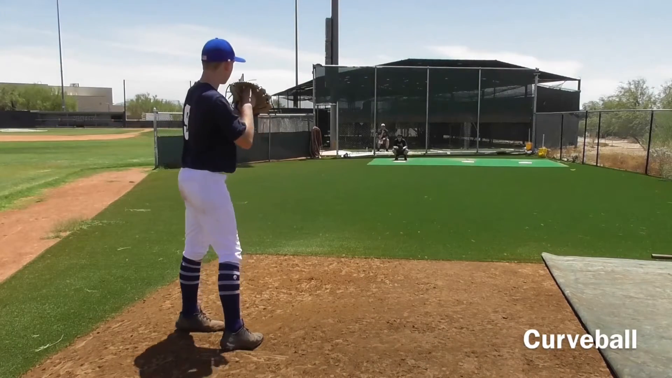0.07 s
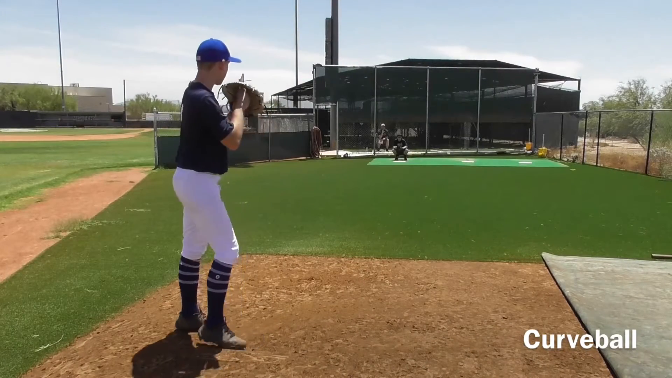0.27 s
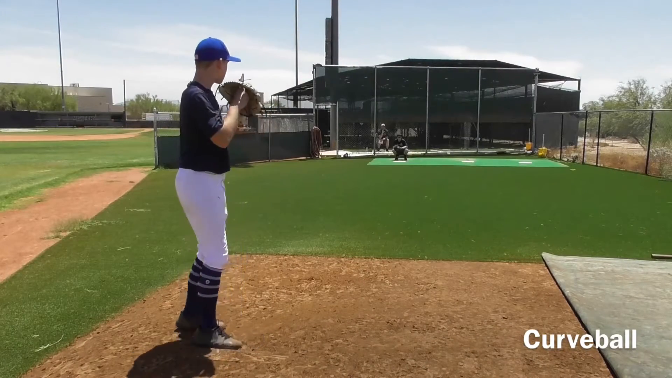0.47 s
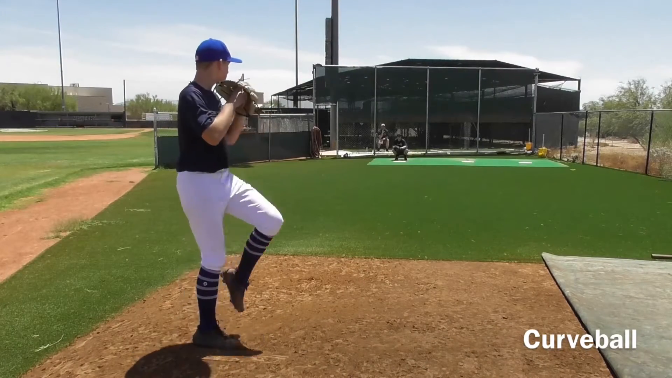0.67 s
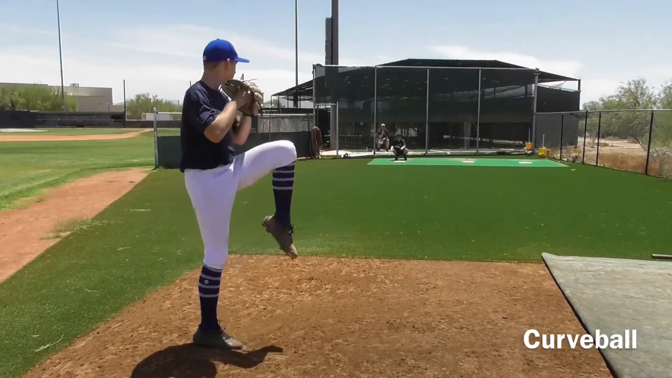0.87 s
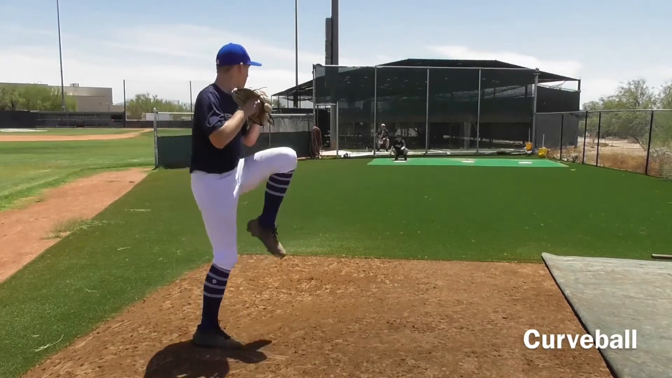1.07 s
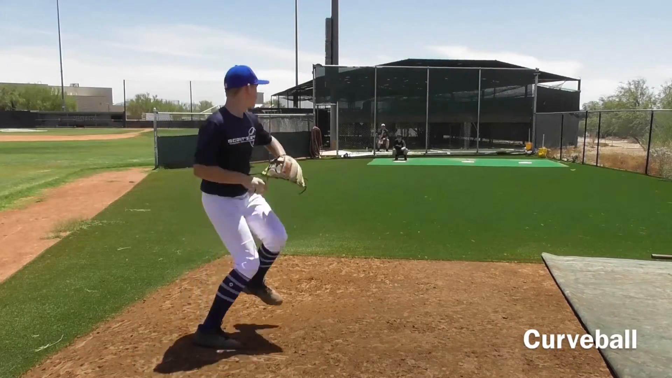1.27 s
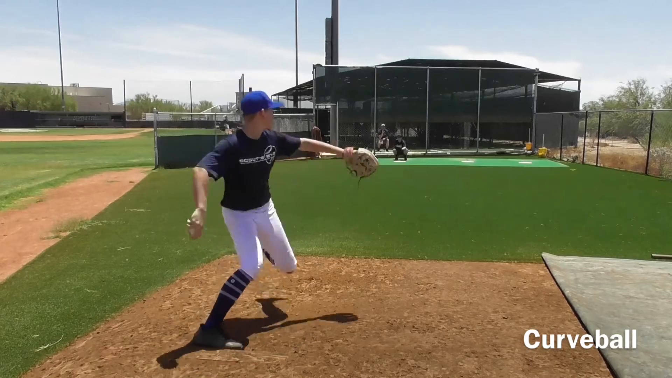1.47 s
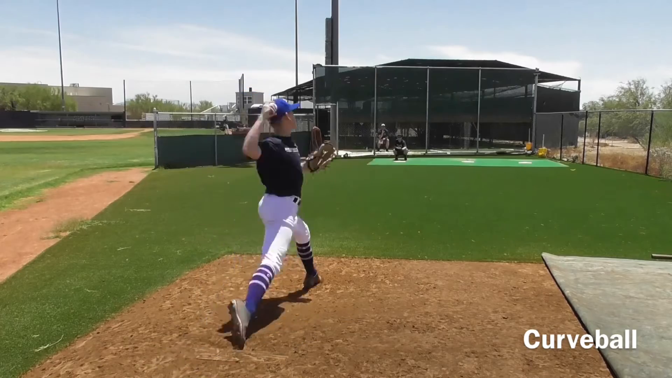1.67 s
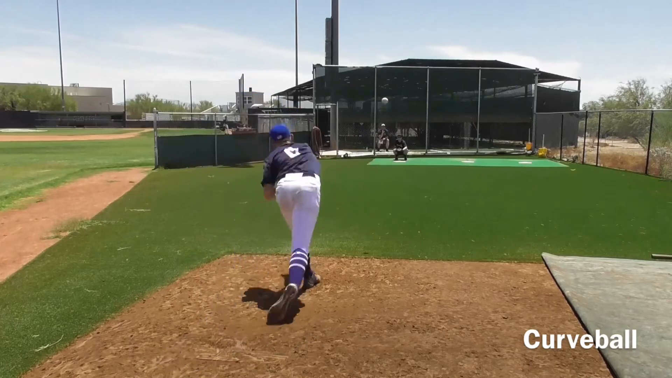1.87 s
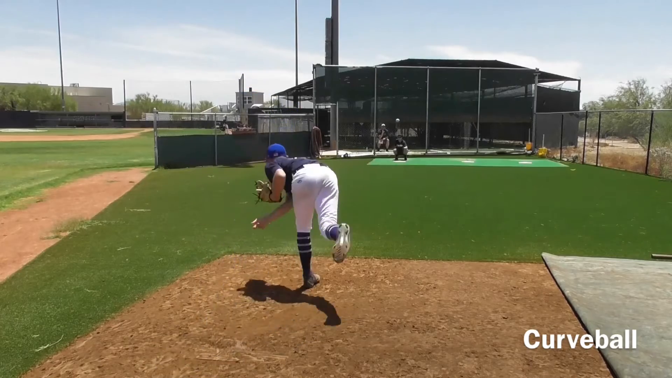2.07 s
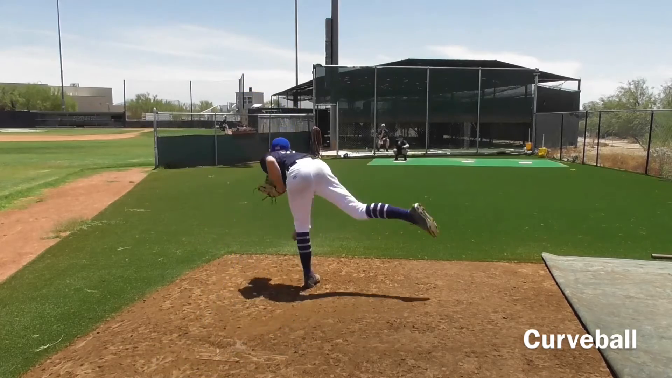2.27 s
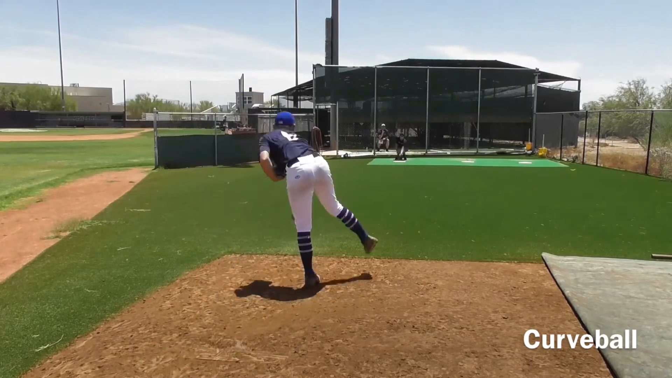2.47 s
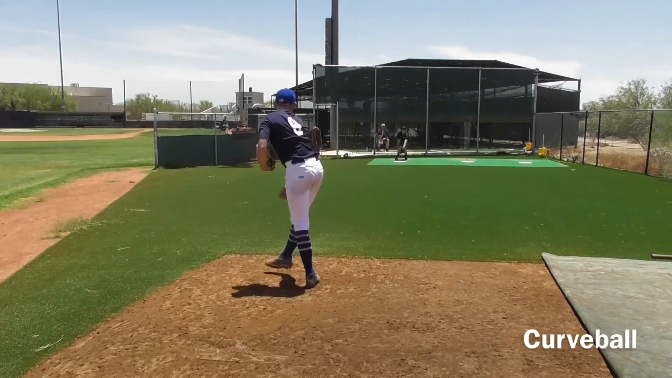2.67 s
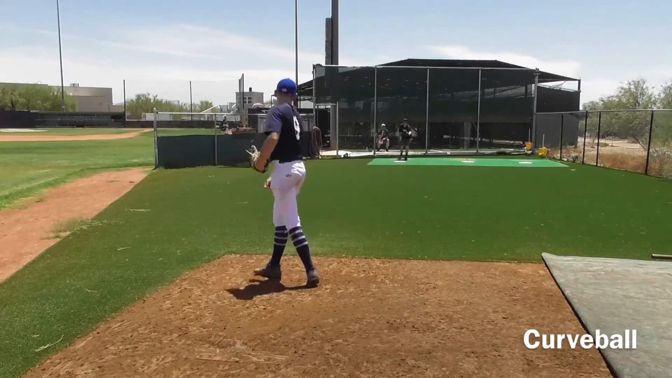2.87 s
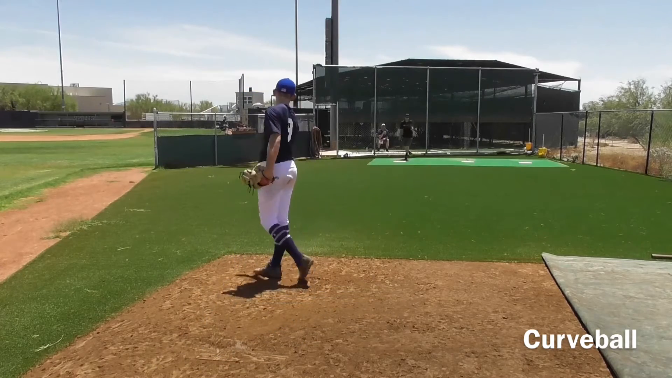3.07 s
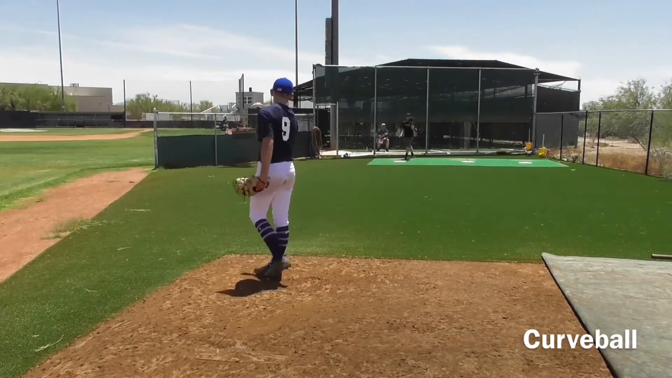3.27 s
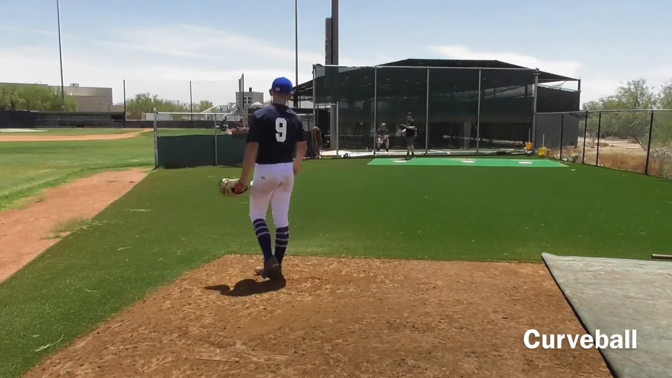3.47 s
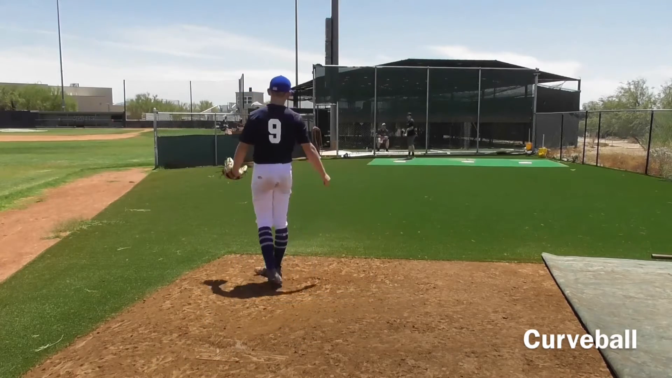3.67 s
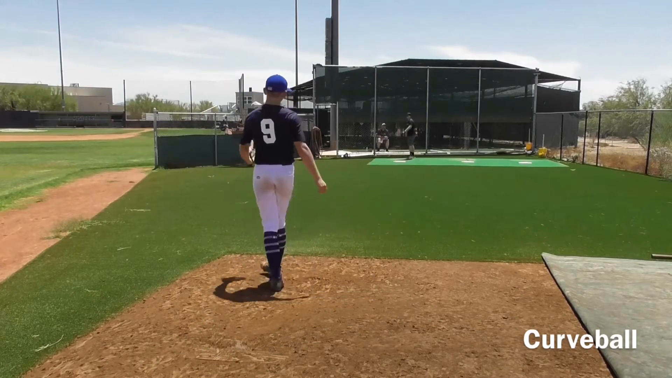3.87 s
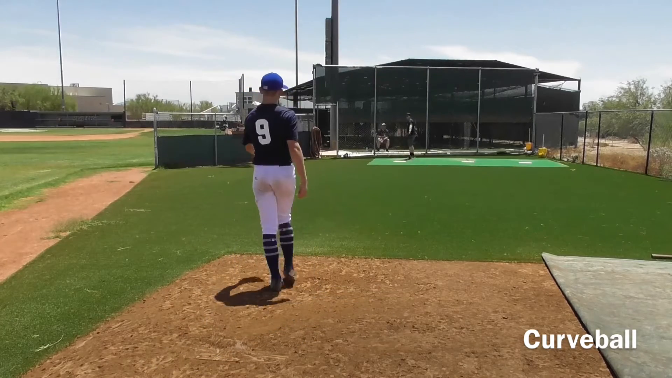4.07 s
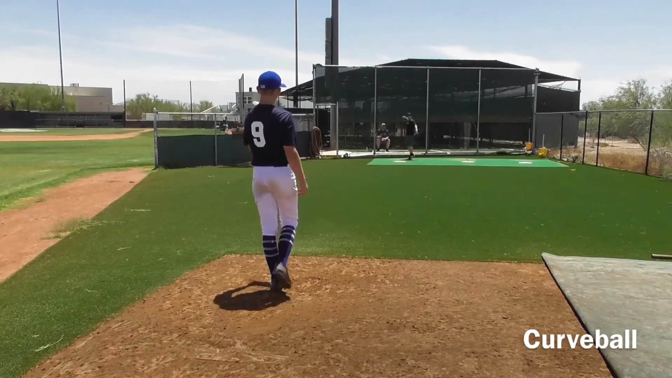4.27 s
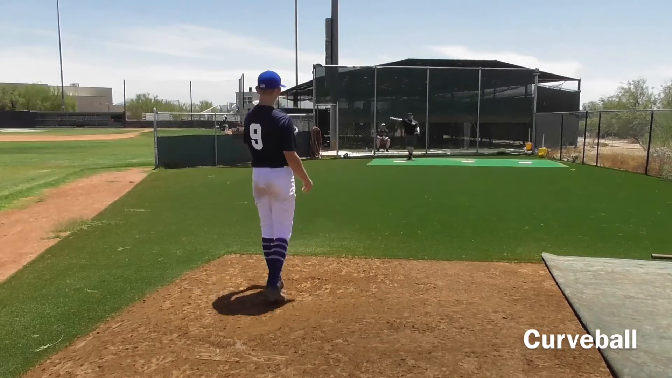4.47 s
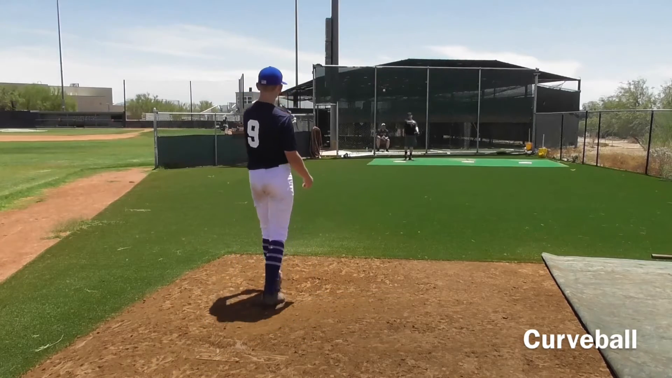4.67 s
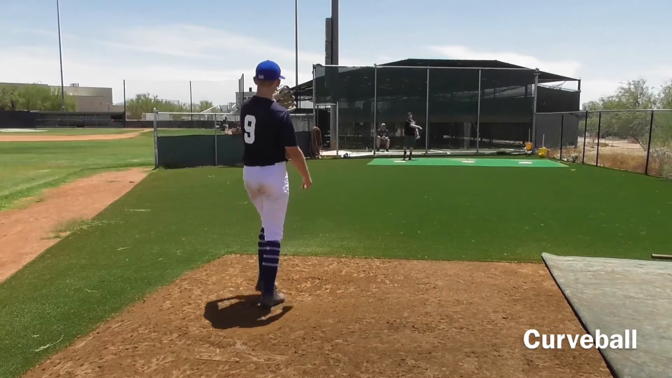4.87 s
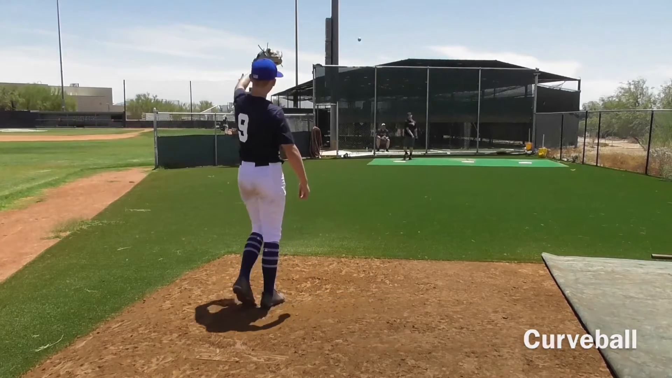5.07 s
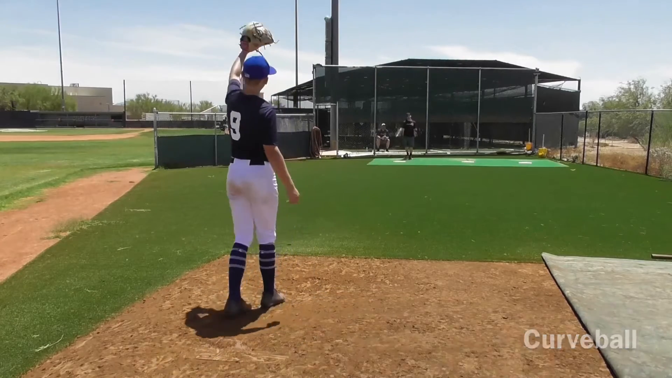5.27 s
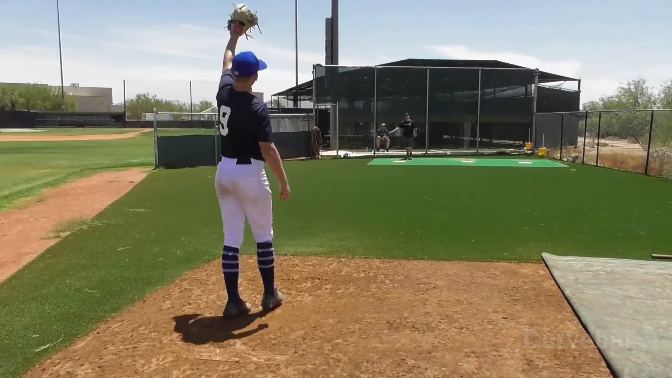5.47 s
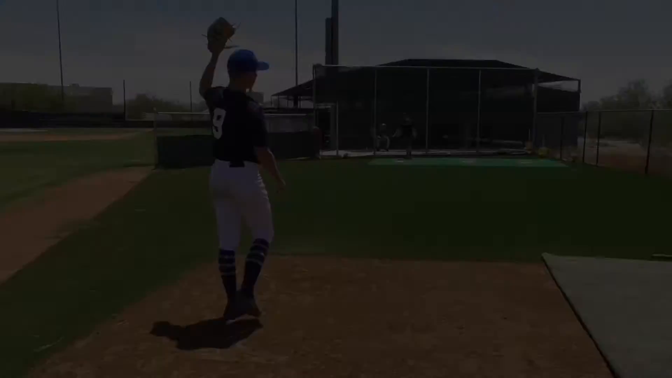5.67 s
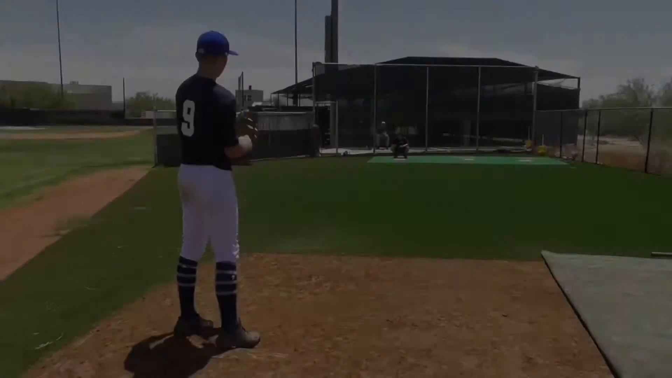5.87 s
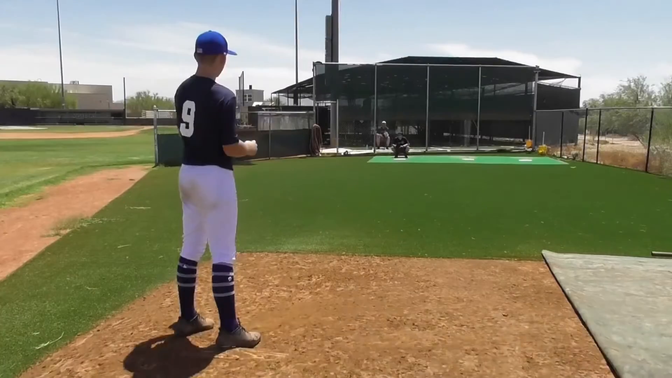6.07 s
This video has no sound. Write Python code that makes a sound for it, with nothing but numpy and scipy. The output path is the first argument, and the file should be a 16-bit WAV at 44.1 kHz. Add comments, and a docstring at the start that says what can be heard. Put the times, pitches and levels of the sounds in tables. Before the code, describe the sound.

From behind a pitching mound on an open field, faint low rumble and a wavering distant hum sit under soft wind thumps and small taps. Shoes crunch and scrape dirt, then a thrown ball lands in a catcher's mitt with a deep, rounded pop and slight shelter echo. After a quiet wait, the return throw smacks crisply into the nearer glove, and a rough gust overloads the microphone.

```python
"""First a wavering far hum and low rumble over an open field, with soft wind thumps and small taps of cleats and glove.
A pitcher's shoes scuff the dirt mound; the ball pops in the catcher's mitt, and the return throw smacks into
the pitcher's own glove, nearer by. At the end a strong gust buffets the microphone.
Filtered noise makes the field, wind and cloth; gliding sines the hum and eddies; sparse grains the dirt;
decaying noise cracks and short pressure swings the catches."""
import sys
import numpy as np
from scipy import signal
from scipy.fft import rfft, irfft, next_fast_len
from scipy.io import wavfile
from scipy.ndimage import uniform_filter1d, map_coordinates

SR = 44100
rng = np.random.default_rng(int(sys.argv[2]) if len(sys.argv) > 2 else 0)


def wrap_up_sound(samples):
    """Save the sound to the file named by the first command line argument, as 16-bit audio."""
    columns = np.atleast_2d(samples).T
    # keep every value between -1 and 1, then stretch to whole-number steps
    tamed = np.clip(columns, -1, 1)
    steps = np.round(tamed * 32767).astype(np.int16)
    wavfile.write(sys.argv[1], SR, steps)


N = 269627
T = np.arange(N) / SR  # time [s]


def undb(db):
    """Decibels to gain."""
    return 10 ** (np.asarray(db) / 20)


def unit(x):
    """Scale to rms 1."""
    return x / np.sqrt(np.mean(x ** 2))


def colour(x, points, tilt_db=0):
    """Filter by (frequency [Hz], level [dB]) points, tilted about 2 kHz by tilt_db per octave."""
    octave = np.log2(np.maximum(np.arange(len(x) // 2 + 1) * SR / len(x), 1))
    hz, db = np.transpose(points)
    below = np.maximum(np.log2(hz[0]) - octave, 0)
    above = np.maximum(octave - np.log2(hz[-1]), 0)
    # beyond the outer points the curve falls 24 dB per octave
    shape = np.interp(octave, np.log2(hz), db) + tilt_db * (octave - 11) - 24 * (below + above)
    return irfft(rfft(x) * undb(shape), len(x))


def white():
    """White noise, padded to a length that transforms fast."""
    return rng.standard_normal(next_fast_len(N, True))


def noise(points):
    """Coloured noise of rms 1."""
    return unit(colour(white(), points)[:N])


def walk(rate):
    """Random drift with a spread near 1, heading for a new value `rate` times a second."""
    knots = rng.standard_normal(4096)
    return 1.2 * map_coordinates(knots, [T * rate], order=1, mode="wrap")


def bump(at, length):
    """A smooth swell around one moment."""
    return np.exp(-np.minimum(((T - at) / length) ** 2, 50))


def swell(at, rise, fall):
    """Grows exponentially up to one moment, then dies away."""
    return np.exp(-np.minimum(np.maximum((at - T) / rise, (T - at) / fall), 50))


def stereo(mid, side=0):
    """Left and right from mid and side."""
    return np.array([mid + side, mid - side])


def add(out, at, sound):
    """Mix a short sound in at a time."""
    i = int(at * SR)
    out[i:i + len(sound)] += sound[:N - i]


def burst(points, t60, tilt_db, rise=0.00072, grain_db=3):
    """A grainy crack of noise that dies away; evened out in pitch so that only the material colours it."""
    t = np.maximum(T[:8192] - .0005, 0)
    envelope = undb(-60 * t / t60) * (1 - np.exp(-t / rise))
    # fibres and grains give way one after another, about a millisecond each
    grains = undb(grain_db * np.repeat(rng.standard_normal(256), 32))
    spectrum = rfft(rng.standard_normal(len(t)) * grains * envelope)
    spectrum /= np.sqrt(uniform_filter1d(np.abs(spectrum) ** 2, size=70))
    crack = colour(irfft(spectrum), points, tilt_db)[:6000]
    # same energy as the envelope, whatever the colour
    return crack * np.sqrt(np.sum(envelope ** 2) / np.sum(crack ** 2))


def surroundings(x, t60, wet_db, width):
    """Scatter from fences and the shelter: a thin tail, a little different at each ear."""
    t = T[:SR // 2]
    fade = undb(-60 * t / t60) * np.minimum(t / .012, 1)
    tails = rng.standard_normal((2, len(t))) * fade / np.sqrt(np.sum(fade ** 2))
    mid, side = (signal.fftconvolve(x, tail)[:N] for tail in tails)
    return undb(wet_db) * stereo(mid, width * side)


# stereo width of the open field: (frequency [Hz], side minus mid [dB])
FIELD_WIDTH = [(60, -0.5), (110, -12.5), (200, -11), (700, -11), (1300, -6), (4400, -48.5), (8000, -19),
               (13000, 4)]


def bed(points):
    """Steady stereo noise, wide in the deep bass and the top."""
    hz, db = np.transpose(points)
    width_hz, width_db = np.transpose(FIELD_WIDTH)
    side_points = np.transpose([hz, db + np.interp(np.log(hz), np.log(width_hz), width_db)])
    mid = colour(white(), points)[:N]
    side = colour(white(), side_points)[:N]
    return stereo(mid, side) / np.std(mid)


# colour of the distant traffic: (frequency [Hz], level [dB])
RUMBLE_COLOUR = [(12, -41), (20, -7.5), (43, -6), (103, -1.5), (136, -4.5), (166, -1), (190, -5.5),
                 (220, -4.5), (270, -9), (377, -10), (463, -17), (793, -16.5), (1700, -37.5), (2210, -37.5),
                 (3740, -120)]
# colour of the rustle: (frequency [Hz], level [dB])
RUSTLE_COLOUR = [(880, -12), (1500, -32), (1640, -7), (2160, -3.5), (2340, -4.5), (2970, -8), (3660, -4.5),
                 (4040, -7.5), (4330, -10.5), (5020, -17), (6630, -11.5), (8240, -3.5), (9470, -5.5),
                 (15100, -10.5), (16000, -9.5)]
# lines of the far machine, before the lull and the wavering: (frequency [Hz], peak level [dB])
HUM_LINES = [(166.5, -49.5), (216.5, -56), (333, -63.5), (384, -62)]
# one slow swell of breeze lifts the background
BREEZE_PEAK_S, BREEZE_RISE_S, BREEZE_FALL_S = 0.96, 0.48, 2.93
RUMBLE_DB, RUMBLE_SWELL_DB = -46.5, 1.5  # in still air, and the lift at the peak
RUSTLE_DB, RUSTLE_SWELL_DB = -70.5, 4
HUM_WAVER, HUM_FADE_DB = 0.00598, 2.5  # share of the pitch; spread of the level
HUM_ARRIVES_S, HUM_LULL_DB = 1.35, -7  # the hum grows from a lull as the breeze carries it in
DIP_S = 5.827


def field():
    """Distant traffic and rustle swell with the breeze; a far machine's hum wavers on it."""
    breeze = swell(BREEZE_PEAK_S, BREEZE_RISE_S, BREEZE_FALL_S)
    rumble = bed(RUMBLE_COLOUR) * undb(RUMBLE_DB + RUMBLE_SWELL_DB * breeze + 0.56 * walk(5.04))
    rustle = bed(RUSTLE_COLOUR) * undb(RUSTLE_DB + RUSTLE_SWELL_DB * breeze)
    lull_db = HUM_LULL_DB * np.maximum(1 - T / HUM_ARRIVES_S, 0)
    hum = 0
    for hz, db in HUM_LINES:
        phase = 2 * np.pi * np.cumsum(hz * (1 + HUM_WAVER * walk(8.04))) / SR
        hum = hum + undb(db + lull_db + HUM_FADE_DB * walk(2.976)) * np.sin(phase)
    # the level dips briefly before the gust
    dip = 1 - .9 * bump(DIP_S, .016)
    balance = undb([[-.3], [.3]])  # the rumble leans right
    return (rumble * balance + rustle + stereo(hum)) * dip


# eddies nudging the microphone: (time [s], level [dB], length [s], centre frequency [Hz])
EDDY_THUMPS = [(0.013, -34, 0.023, 79.6), (0.11, -30, 0.018, 80.3), (0.205, -37, 0.028, 90.2),
               (0.256, -30.5, 0.011, 54.2), (1.033, -40, 0.017, 65), (1.32, -31, 0.0089, 65.7),
               (1.416, -27, 0.0078, 62)]
EDDY_OCTAVE_DB = -11  # smaller whirls an octave above each eddy


def eddies():
    """Light wind thumps both microphone ports alike: short low tones of wobbling pitch."""
    out = 0
    wobble = np.cumsum(undb(1.155 * walk(60))) / SR  # time that runs unevenly
    for at, db, length, hz in EDDY_THUMPS:
        phase = 2 * np.pi * hz * wobble
        whirl = np.sin(phase) + undb(EDDY_OCTAVE_DB) * np.sin(2 * phase)
        out = out + undb(db) * bump(at, length) * whirl
    return stereo(out)


# faint swishes of cloth and turf: (time [s], level [dB], length [s], centre frequency [Hz])
SOFT_RUBS = [(1.233, -73, .06, 8500), (1.55, -69, 0.037, 8500), (3.09, -66, 0.16, 1370),
             (3.13, -47, 0.085, 247), (3.197, -77.5, 0.12, 3700), (3.673, -72, .1, 2300),
             (5.2, -74.5, 0.11, 3500), (5.61, -71.5, 0.07, 8500)]


def swishes():
    """Soft rubs as the players shift and walk: swells of noise around one pitch."""
    out = 0
    for at, db, length, hz in SOFT_RUBS:
        band = [(hz * 0.57, -18), (hz, 0), (hz * 1.37, -18)]
        out = out + undb(db) * bump(at, length) * noise(band)
    return stereo(out)


# small knocks of cleats and glove: (time [s], level [dB], tilt [dB/octave])
TAPS = [(.161, -44, -2), (.326, -38, -3), (.523, -47, -2), (.591, -33.5, -6.5), (.617, -47, -1),
        (1.183, -32.5, 0), (1.686, -28, -7), (2.222, -51, 1), (2.770, -34, -3), (4.574, -54, 6),
        (5.613, -47.5, 0.5), (5.655, -43, -.5)]
# colour of a knock: (frequency [Hz], level [dB])
TAP_COLOUR = [(170, -8.5), (500, 2), (1000, -2), (1500, -13), (2100, -11), (3800, -20.5), (5200, -30.5),
              (8000, -18), (15000, -29)]
TAP_T60_S = 0.026


def knocks():
    """Short taps of cleats and glove: brief noise bursts, scattered by the surroundings."""
    out = np.zeros(N)
    for at, db, tilt_db in TAPS:
        add(out, at, undb(db) * burst(TAP_COLOUR, TAP_T60_S, tilt_db, rise=0.00073))
    return stereo(out) + surroundings(out, t60=0.27, wet_db=-9.5, width=0.26)


def grit(points, spread_db, tilt_db=0):
    """Dense grains of unequal size and random sign, coloured to rms 1."""
    present, sign, size = rng.random((3, next_fast_len(N, True)))
    weight = undb(-spread_db * np.log(np.maximum(size, .005)))  # few large grains, many small
    grains = (present < .12) * np.sign(sign - .5) * weight
    return unit(colour(grains, points, tilt_db)[:N])


# shoes on the mound (heel lands, sole slides, back toe drags, leg swings through):
# (time [s], crunch level [dB], dust level [dB], dust tilt [dB/octave], rise [s], fall [s])
MOUND_SCUFFS = [(1.689, -50.5, -56.5, 0, 0.02, 0.032), (1.741, -45, -44.5, 1, 0.021, 0.019),
                (1.845, -45, -52, 11, 0.013, 0.038), (2.255, -74, -62.5, 10, .022, 0.043)]
# colour of the crunching dirt: (frequency [Hz], level [dB])
DIRT_COLOUR = [(250, 7), (800, 14.5), (1400, 2), (2200, -0.5), (2900, -7), (3700, -2.5), (5100, -21),
               (7500, -4), (11000, -14), (15500, -24)]
# colour of the sprayed dust: (frequency [Hz], level [dB])
DUST_COLOUR = [(2000, -4), (4000, -5), (5200, -9), (6200, -3.5), (7500, 3), (10000, -3.5), (14000, -18)]
SETTLE_DB, SETTLE_S = -14.5, 0.18  # thrown dust falls back
SLIP_HZ, SLIP_DB = 258.6, 4.5  # the sole catches and slips every few milliseconds


def shoes():
    """Each scuff crunches into the mound and sprays loose dirt, which then settles."""
    dig, dust = 0, 0
    for at, crunch_db, dust_db, tilt_db, rise, fall in MOUND_SCUFFS:
        push = swell(at, rise, fall)
        thrown = np.maximum(push, undb(SETTLE_DB) * swell(at, rise, SETTLE_S))
        dig = dig + undb(crunch_db) * push
        dust = dust + undb(dust_db) * thrown * grit(DUST_COLOUR, spread_db=3.0, tilt_db=tilt_db)
    slip = undb(SLIP_DB * walk(SLIP_HZ) - 1)
    crunch = dig * slip * grit(DIRT_COLOUR, spread_db=4.5)
    # the dust follows the slipping only half as far in dB
    direct = stereo(crunch + dust * np.sqrt(slip))
    return direct + surroundings(crunch, t60=0.18, wet_db=-8, width=0.19)


# colour of the gust common to both ports: (frequency [Hz], level [dB])
GUST_MID_COLOUR = [(15, -50), (25, -21), (63, -13), (141, 0), (262, -4), (298, -1), (541, -12.5),
                   (737, -18), (1110, -27), (2750, -68.5), (4160, -63), (4610, -84), (8150, -71),
                   (12000, -77), (15600, -102), (22000, -120)]
# colour of the gust opposed between the ports: (frequency [Hz], level [dB])
GUST_SIDE_COLOUR = [(15, -67), (25, -37), (82, -18.5), (119, -16), (157, 0.5), (192, -4.5), (298, -4.5),
                    (334, -3.5), (410, -0.5), (980, -16.5), (1380, -28), (2690, -64.5), (6000, -65),
                    (7800, -108), (13200, -120)]
# sharp buffets inside the gust: (time [s], lift in level [dB])
GUST_BUFFETS = [(5.892, 2.5), (5.903, 2), (5.948, 5), (5.968, 9), (6.019, 5)]
BUFFET_S = 0.0049
# the gust swells from a low start, then slowly sags
GUST_START_S, GUST_ATTACK_S, GUST_RISE_DB, GUST_SAG_DB_PER_S = 5.83, 0.064, 24.5, 4.5
GUST_MID_DB, GUST_SIDE_DB, FLUTTER_DB = -24.5, -22, 2


def wind():
    """The strong gust pushes the two ports partly together, partly in opposition, in uneven buffets."""
    age = np.maximum(T - GUST_START_S, 0)
    rise_db = -GUST_RISE_DB * np.maximum(1 - age / GUST_ATTACK_S, 0)
    force = undb(rise_db - GUST_SAG_DB_PER_S * age) * np.minimum(age / .004, 1)
    flutter = uniform_filter1d(walk(140), size=64)
    lift_db = sum(db * bump(at, BUFFET_S) for at, db in GUST_BUFFETS)
    buffet = undb(FLUTTER_DB * flutter + lift_db)
    mid = undb(GUST_MID_DB) * noise(GUST_MID_COLOUR) * buffet
    side = undb(GUST_SIDE_DB) * noise(GUST_SIDE_COLOUR) * buffet
    gust = force * stereo(mid, side) * undb([[-.7], [.7]])  # leans right
    # the hardest pushes are rounded off and stay dull
    rounded = .6 * np.tanh(gust / .6)
    return signal.sosfilt(signal.butter(2, 3200, fs=SR, output="sos"), rounded)


def puff(hz, rise, ring):
    """A pressure swing that builds and fades within a few cycles, centred 0.1 s in."""
    u = (T[:SR // 5] - .1) * hz
    return np.sin(2 * np.pi * u) * np.exp(-(u / np.where(u < 0, rise, ring)) ** 2)


def contact(at, hz, cycles):
    """The puff of air that one contact squeezes out, centred 0.8 cycle after it."""
    out = np.zeros(N)
    add(out, at + .8 / hz - .1, puff(hz, rise=.65, ring=cycles))
    return out


# ball caught in leather, first the catcher's mitt, then the pitcher's glove:
# (first touch [s], ball seats [s], rub level [dB], rub t60 [s], glance frequency [Hz], glance level [dB],
#  pocket puff level [dB], puff frequency [Hz], ring [cycles], palm slap level [dB], slap frequency [Hz],
#  crack level [dB], crack t60 [s], crack tilt [dB/octave], rebound gap [s], loss per rebound [dB])
LEATHER_CATCHES = [(2.5125, 2.5284, -44.5, .1, 420, -15, -6, 383, 0.37, -24, 855, -37, 0.034, 5, 0.00856, 17),
                   (5.5, 5.506, -28.5, 0.036, 643, -26, -9, 453, 0.9, -11.5, 1040, -14.5, 0.012, 0, 0.00592, 4)]
# colour of the leather: (frequency [Hz], level [dB])
LEATHER_COLOUR = [(550, -13), (1150, 4.5), (1750, -9.5), (2350, -6.5), (2800, -14), (3900, -7.5),
                  (4400, -16), (5100, -23), (6700, -22.5), (7700, -16), (10000, -22), (15500, -41)]
RUB_TILT_DB = 3  # per octave
GLANCE_SHARE = .37  # of the way from first touch to seating, the ball glances off the pocket's side
GLANCE_CRACK_DB, GLANCE_T60_S, GLANCE_TILT_DB = -30, 0.036, -5  # tilt per octave
GLANCE_CYCLES, SLAP_CYCLES = 0.95, 1
REBOUND_PITCH, REBOUND_CYCLES = 0.91, 0.67  # the pocket rings a little lower as it slackens


def catches():
    """The ball rubs along the leather, glances, seats with a crack and a puff of air, and rebounds twice."""
    air, crack = np.zeros(N), np.zeros(N)
    for (touch, seat, rub_db, rub_t60, glance_hz, glance_db, puff_db, puff_hz, cycles, slap_db, slap_hz,
         crack_db, crack_t60, tilt_db, gap, loss_db) in LEATHER_CATCHES:
        glance = touch + GLANCE_SHARE * (seat - touch)
        add(crack, touch, undb(rub_db) * burst(LEATHER_COLOUR, rub_t60, RUB_TILT_DB))
        add(crack, glance, undb(GLANCE_CRACK_DB) * burst(LEATHER_COLOUR, GLANCE_T60_S, GLANCE_TILT_DB))
        add(crack, seat, undb(crack_db) * burst(LEATHER_COLOUR, crack_t60, tilt_db))
        air += undb(glance_db) * contact(glance, glance_hz, GLANCE_CYCLES)
        air += undb(puff_db) * contact(seat, puff_hz, cycles)
        air += undb(slap_db) * contact(seat, slap_hz, SLAP_CYCLES)
        for k in (1, 2):
            rebound = contact(seat + k * gap, puff_hz * REBOUND_PITCH, REBOUND_CYCLES)
            air += undb(puff_db - k * loss_db) * rebound
    # the leather's treble scatters more readily than the low puff
    ground = surroundings(air + undb(4.5) * crack, t60=0.13, wet_db=-20.0, width=0.35)
    # the catcher crouches before the shelter, so his pop rings on and comes back off its wall
    is_mitt = T < 4
    mitt = (air + undb(4) * crack) * is_mitt
    shelter = surroundings(mitt, t60=0.52, wet_db=-18.5, width=0.071)
    echo = np.roll(crack * is_mitt, shift=int(0.026 * SR))
    wall = surroundings(echo, t60=0.033, wet_db=-16.5, width=0.12)
    # a crack three samples late widens the direct sound
    direct = stereo(air + crack, 0.14 * np.roll(crack, shift=3))
    return direct + ground + shelter + wall


def scene():
    """Everything heard from behind the mound."""
    return field() + eddies() + swishes() + knocks() + shoes() + wind() + catches()


TOP_HZ = 15700


def record(dry):
    """The camera cuts the top with a steep low-pass."""
    return signal.sosfilt(signal.ellip(10, .1, 70, TOP_HZ, fs=SR, output="sos"), dry)


dry = scene()
out = record(dry)
wrap_up_sound(out)
```